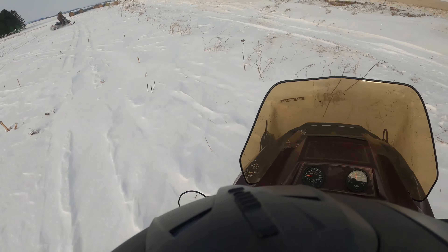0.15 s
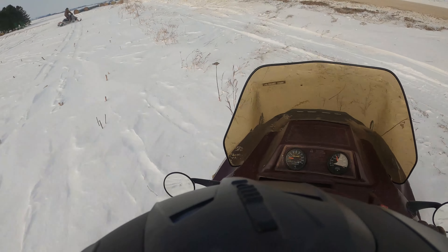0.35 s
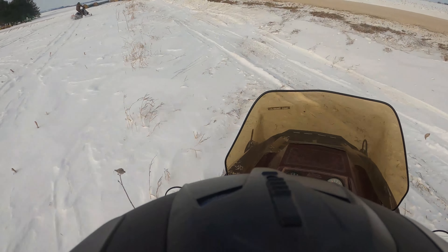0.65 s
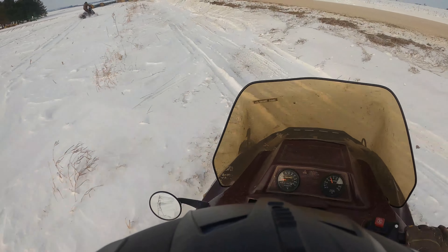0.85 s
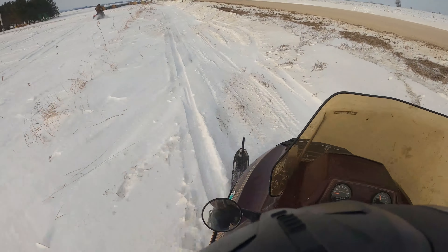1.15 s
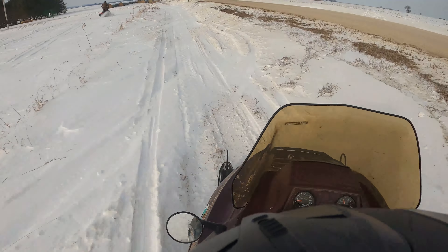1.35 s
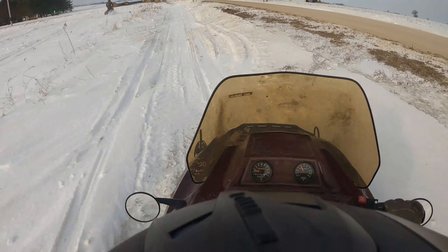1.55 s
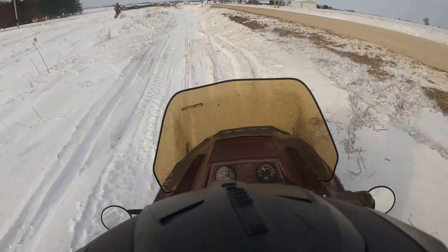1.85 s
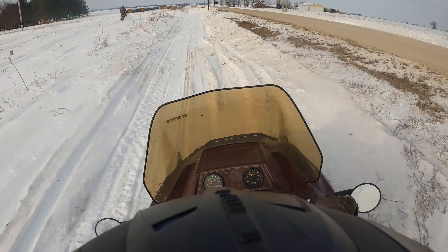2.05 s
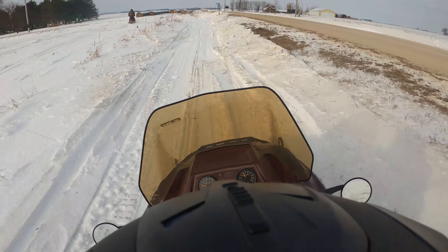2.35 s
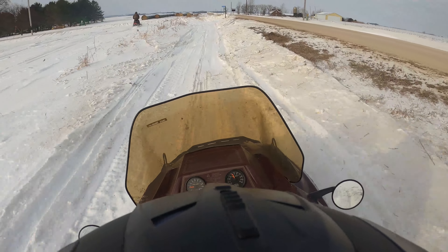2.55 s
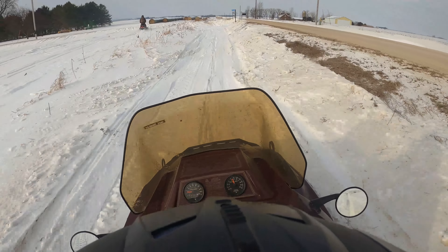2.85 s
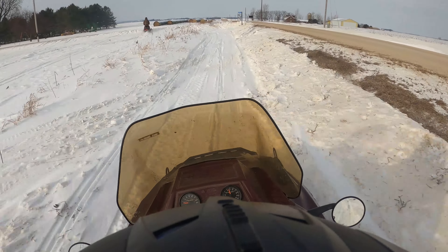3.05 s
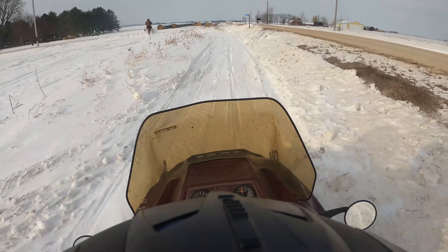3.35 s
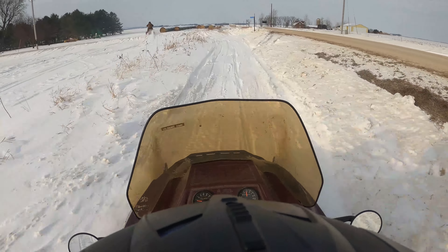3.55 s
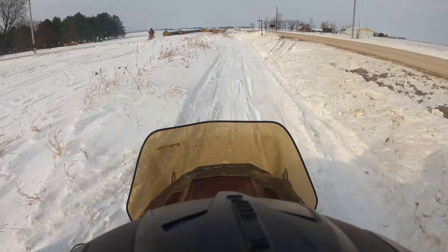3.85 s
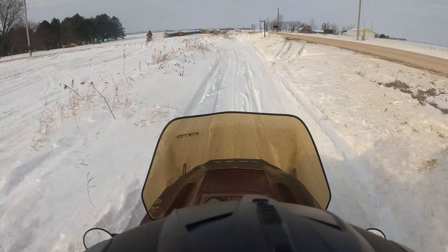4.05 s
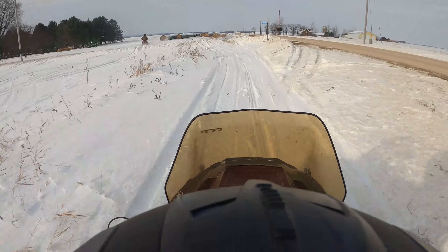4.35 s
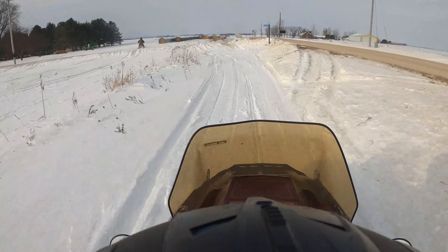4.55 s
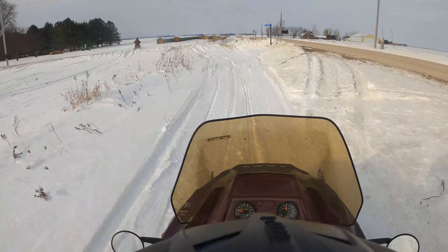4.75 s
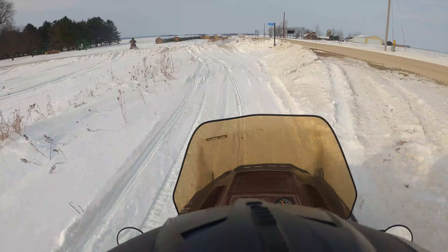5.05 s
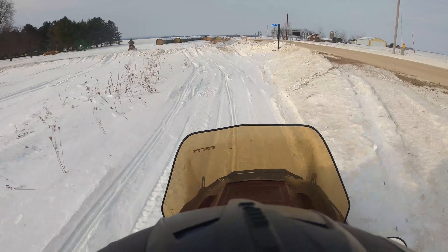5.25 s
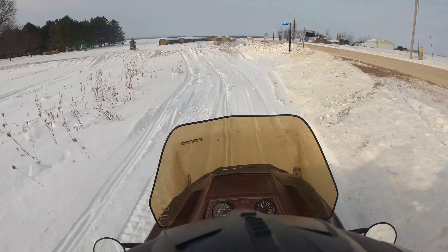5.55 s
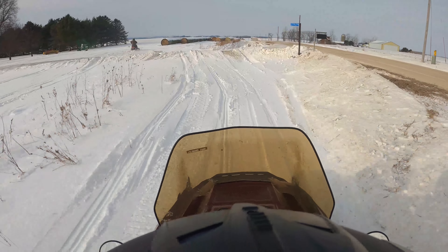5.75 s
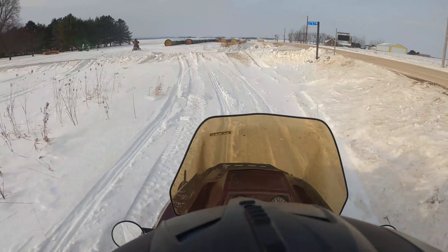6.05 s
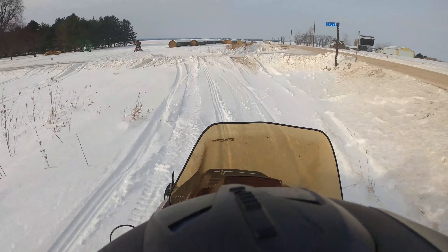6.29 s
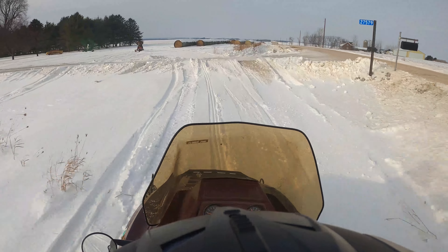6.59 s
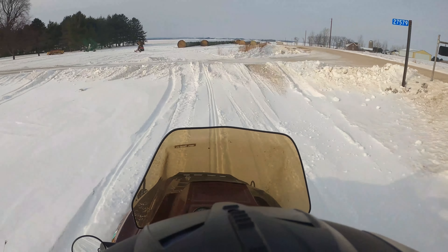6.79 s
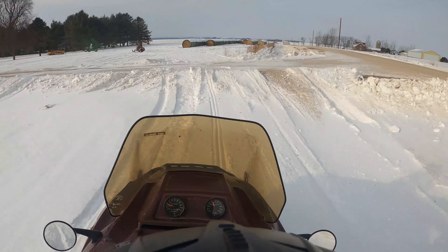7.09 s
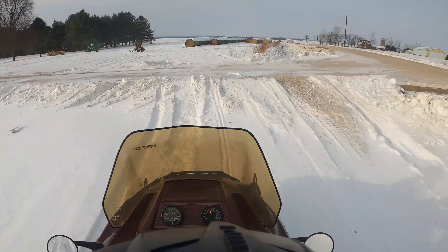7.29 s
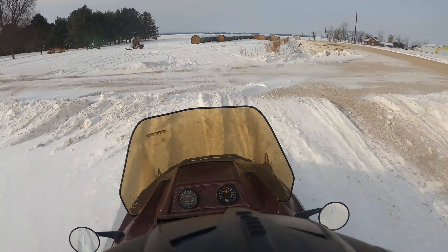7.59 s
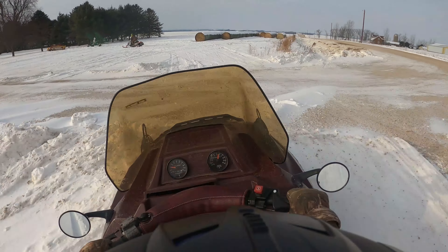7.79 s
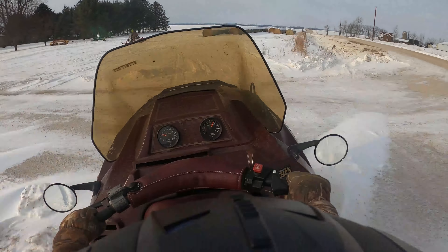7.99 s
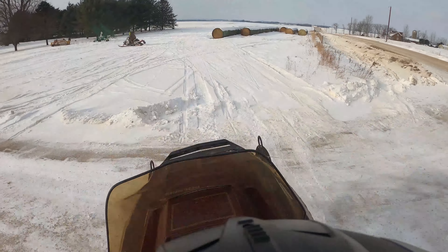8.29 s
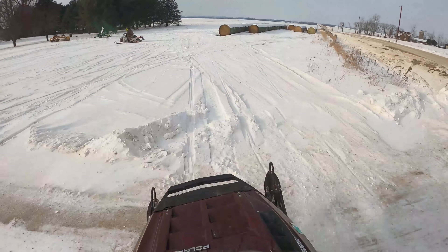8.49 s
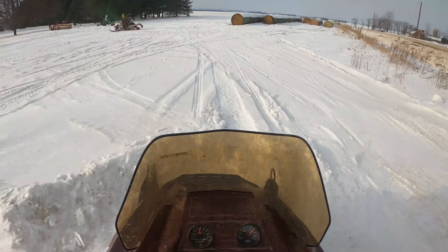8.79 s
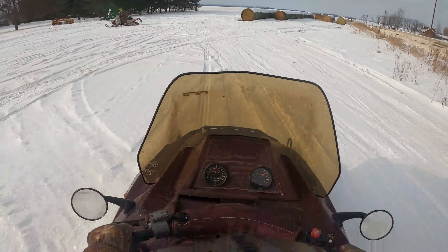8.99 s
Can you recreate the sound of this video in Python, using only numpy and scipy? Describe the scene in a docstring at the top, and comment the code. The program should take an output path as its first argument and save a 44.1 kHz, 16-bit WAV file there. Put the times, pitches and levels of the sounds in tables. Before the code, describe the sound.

Riding a snowmobile outdoors: droning engine, low track growl and wind buffeting, ending with a sharp rev, spinning track and rattling landing thumps.

```python
"""A two-stroke twin snowmobile, heard from a boxed microphone pair on the rider's helmet.
From the start, sines at the firing rate and its relatives make the engine hum, whine and buzz, and shaped
noise makes its roar and hiss. The track lugs drone at their own rate; shaped noise is wind and rumble.
Later come short falling tones, first low swoops, then also higher chirps. Near the end the engine revs up
over a bank, the track spins free, and the sled thumps down: a row of blows rings the chassis."""
import sys
import numpy as np
from scipy import signal
from scipy.fft import rfft, irfft, next_fast_len
from scipy.io import wavfile
from scipy.ndimage import uniform_filter1d

SR = 44100
rng = np.random.default_rng(int(sys.argv[2]) if len(sys.argv) > 2 else 0)


def generate_wav(signal):
    """Clip the signal to [-1, 1] and save it as 16-bit WAV at the path in sys.argv[1]."""
    frames = np.transpose(np.atleast_2d(signal))
    scaled = np.clip(frames, -1, 1) * 32767
    pcm = np.round(scaled).astype(np.int16)
    wavfile.write(sys.argv[1], SR, pcm)


N = 402633

# Engine speed: (time [s], firing rate [firings per s]); two firings make one crank turn
FIRING_RATE = [(0, 133), (.45, 133.4), (.6, 129.3), (1.35, 124.4), (1.65, 128), (1.95, 126.7), (2.1, 129.4),
               (2.3, 135.3), (2.6, 141.5), (3.15, 145.1), (3.45, 149.9), (3.75, 151.6), (4.02, 160.9),
               (4.2, 160.9), (4.55, 150.5), (5.25, 125.7), (5.7, 117.3), (6, 123.9), (6.2, 125), (6.5, 132),
               (7.05, 135.5), (7.2, 140.2), (7.36, 147.2), (7.49, 159.3), (7.58, 166), (7.72, 181),
               (7.82, 196), (7.93, 212), (8.1, 217.5), (8.27, 240), (8.36, 245), (8.55, 245.3), (8.7, 229),
               (8.8, 223), (8.87, 212), (8.97, 210), (9.05, 196), (9.13, 186)]
# Load on the engine: (time [s], extra level of roar and hiss [dB])
ENGINE_LOAD = [(0, 1), (.85, -0.5), (1.15, 0.5), (2, -1.5), (3.55, 2), (3.85, 0.5), (4.15, 2), (4.7, 1),
               (5.4, -2), (6.7, -1.5), (7.4, 0), (7.57, 3.5), (7.72, -1.5), (7.9, 2.5), (8.3, 2.5),
               (8.6, 3), (8.76, 2.5), (9, 3), (9.13, 2.5)]
# Throttle opening sharpens the exhaust pulses: (time [s], buzz level [dB])
THROTTLE_BUZZ = [(0, -33.5), (1.6, -34), (2.2, -32.5), (3.2, -32.5), (4.3, -31.5), (4.7, -34.5), (5.4, -36),
                 (6.9, -35), (7.3, -29.5), (7.55, -26), (8.05, -26.5), (8.3, -28.5), (8.6, -29),
                 (8.75, -32), (9.13, -32)]
# Exhaust hum: (time [s], firing tone [dB], its octave [dB])
EXHAUST_HUM = [(0, -19.5, -29), (.5, -21, -34.5), (.95, -22, -26), (1.4, -15, -28), (1.95, -16.5, -27),
               (2.25, -19, -39), (2.6, -19.5, -34.5), (3.3, -35, -28), (3.5, -21.5, -28.5), (3.7, -29, -26),
               (4.1, -16.5, -45), (4.4, -24, -35), (4.85, -24.5, -43), (5.4, -29.5, -26),
               (5.85, -19, -24.5), (6.45, -16.5, -35), (7.1, -19.5, -33), (7.36, -28, -28),
               (7.7, -19, -24.5), (7.95, -11.5, -39), (8.08, -14, -29.5), (8.24, -18, -30.5),
               (8.56, -26, -23), (8.63, -19.5, -24.5), (8.75, -27, -29), (8.81, -19.5, -30),
               (8.92, -11.5, -43), (9.04, -14.5, -50), (9.08, -23.5, -26), (9.13, -22, -30)]
# Hum tones set by engine speed alone: (firing rate [firings per s], crank tone [dB], triple firing tone [dB])
HUM_BY_SPEED = [(117, -39, -42), (125, -35, -37), (129, -37, -37), (133, -37, -34), (140, -36, -30),
                (145, -36, -33), (152, -33, -30), (161, -32, -33), (168, -30, -35), (180, -30, -35),
                (200, -31, -35), (212, -26, -35), (232, -22, -36), (242, -20, -36)]
# Cooling fan whine: (time [s], level [dB])
FAN_LEVEL = [(0, -30), (0.2, -41), (0.22, -40), (0.28, -31.5), (0.52, -46), (0.59, -55), (1.15, -35),
             (1.26, -44.5), (1.35, -42), (1.68, -35.5), (1.86, -60), (2.21, -35), (2.42, -52), (2.67, -42),
             (3.21, -37.5), (3.49, -54.0), (4.15, -41.5), (4.58, -52), (4.7, -36), (4.84, -47), (5.01, -35),
             (5.27, -38), (5.43, -54.0), (5.87, -54.0), (5.98, -39.5), (6.42, -45), (6.88, -33),
             (7.11, -43.0), (7.32, -35.5), (7.75, -58), (8.2, -63), (8.45, -53), (8.75, -59), (9.13, -67)]
# Single crank multiples that sing out: (peak time [s], half length [s], multiple [crank rates], level [dB])
SQUEAL_EVENTS = [(0.26, 0.18, 17, -28.0), (0.9, 0.12, 18, -26.0), (1.3, 0.12, 18, -27.0),
                 (1.43, 0.1, 17, -32.0), (1.96, 0.22, 18, -26.0), (2.12, 0.22, 14, -29.0),
                 (2.17, 0.12, 16, -28.0), (2.29, 0.19, 17, -27.0), (2.5, 0.28, 18, -31.0),
                 (2.54, 0.3, 16, -29.0), (2.68, 0.33, 3, -30.0), (2.84, 0.22, 12, -36.0),
                 (2.87, 0.22, 17, -30.0), (2.91, 0.15, 15, -27.0), (2.96, 0.15, 16, -31.0),
                 (3.74, 0.22, 15, -27.0), (3.86, 0.12, 14, -29.0), (4.11, 0.18, 13, -28.0),
                 (4.33, 0.16, 14, -27.0), (5.48, 0.1, 5, -34.0), (5.72, 0.1, 18, -28.0),
                 (6.26, 0.1, 7, -34.0), (6.64, 0.12, 17, -29.0), (7.34, 0.18, 8, -37.0),
                 (7.42, 0.1, 15, -25.0), (7.53, 0.1, 14, -26.0), (7.62, 0.11, 13, -28.0),
                 (7.62, 0.14, 10, -30.0), (7.73, 0.39, 12, -28.0), (7.83, 0.25, 11, -24.0),
                 (7.88, 0.1, 9, -32.0), (7.88, 0.3, 5, -33.0), (7.99, 0.21, 7, -35.0),
                 (8.03, 0.24, 8, -30.0), (8.06, 0.1, 15, -38.0), (8.09, 0.18, 10, -27.0),
                 (8.33, 0.19, 5, -32.0), (8.51, 0.1, 11, -33.0), (8.52, 0.28, 3, -31.0),
                 (8.56, 0.15, 14, -40.0), (8.61, 0.24, 10, -26.0), (8.68, 0.1, 12, -31.0),
                 (8.68, 0.11, 9, -28.0), (9.05, 0.09, 11, -29.0), (.1, .12, 17, -29), (.55, .12, 16, -30),
                 (7.48, .12, 11, -31), (7.5, .12, 10, -33), (7.52, .1, 12, -30), (7.7, .12, 9, -33),
                 (2.74, .08, 38, -57), (2.96, .14, 42, -53), (2.96, .1, 48, -54), (3.12, .08, 36, -59),
                 (3.32, .06, 38, -54), (3.35, .1, 35, -57), (3.52, .04, 46, -49), (3.53, .04, 40, -47),
                 (3.71, .08, 40, -50), (3.92, .04, 36, -46), (4.1, .06, 33, -53), (4.14, .11, 42, -43),
                 (4.23, .07, 36, -50), (7.93, .06, 38, -51), (8.03, .05, 32, -47), (8.35, .07, 27, -45),
                 (8.4, .07, 30, -48), (8.4, .1, 18, -43), (8.46, .12, 21, -51), (8.36, .08, 28, -46),
                 (8.45, .12, 26, -48), (8.57, .06, 28, -47)]
# The two cylinders differ, so odd crank multiples sound too: (multiple [crank rates], extra level [dB])
BUZZ_MULTIPLES = [(3, 3), (5, 3), (7, 0), (8, 0), (9, -2), (10, -1), (11, 0), (12, 0), (13, -4), (14, 0),
                  (15, 0), (16, -1), (17, 1), (18, 1), (19, -4), (20, -3), (21, -1), (22, 0), (23, -1),
                  (25, 1), (26, -1), (27, -2), (28, -1), (30, -3), (32, -3), (34, -3), (36, -4), (38, -5),
                  (42, -5), (46, -4), (48, -3), (50, -4), (52, -3)]
# Tone colour of the buzz: (frequency [Hz], level per tone [dB])
BUZZ_COLOUR = [(150, -9), (250, -11), (400, -9), (550, -10), (700, -11.5), (850, -5.5), (1000, -1.5),
               (1120, .5), (1250, -6), (1450, -15), (1700, -19), (2100, -22), (2500, -32), (2900, -26),
               (3400, -24), (4500, -36)]
# Colours of the noises, only their shape counts: (frequency [Hz], relative level per Hz [dB])
RASP_COLOUR = [(5500, -33), (6400, -8), (7000, 2.5), (7500, -8), (8100, -35.5), (9800, -24), (11500, -22.5),
               (13000, -66)]
ROAR_COLOUR = [(320, -42), (550, -10), (709, -11.5), (1100, 2.5), (1260, -6.5), (1350, -9.5), (1640, -11),
               (1830, -19), (2000, -18.5), (2370, -31), (2600, -44.5), (3380, -71.5), (5720, -120)]
HISS_COLOUR = [(1410, -45.5), (2400, -9), (2540, -8), (2780, -6), (2930, -4), (3020, -2), (3130, -5),
               (3280, 0.5), (3370, -3), (3450, -0.5), (3620, -5), (3760, -2.5), (3870, -6), (4000, -1.5),
               (4200, -3.5), (4930, -12), (5400, -16.5), (7020, -42.5), (11900, -120)]
SIZZLE_COLOUR = [(3500, -37), (4800, -11.5), (5400, 3.5), (6200, 2), (7000, -2.5), (7700, -7.5),
                 (8300, -32), (9500, -29), (12000, -23.5)]
BUFFET_COLOUR = [(15, -19.5), (25, -5), (40, -2.5), (65, 1), (100, 6.5), (140, -3), (200, -20),
                 (500, -90.5)]
RUMBLE_COLOUR = [(60, -30), (110, 0), (150, 3), (200, 1), (300, -2.5), (450, -1.5), (620, -11.5),
                 (800, -29.5), (1500, -89)]
# Treble sizzle of the engine: (time [s], level [dB])
SIZZLE_LEVEL = [(0.05, -59), (0.2, -62.5), (1.74, -59.5), (1.79, -62.5), (4.26, -61.5), (5.36, -63.5),
                (7.08, -63), (7.25, -58), (7.43, -62), (7.55, -53), (7.68, -57), (8.28, -55.5),
                (8.57, -53.5), (8.7, -52.5), (8.72, -58.5), (9.0, -57)]
# Track lugs slapping past the drive wheel: (time [s], lug rate [lugs per s])
LUG_RATE = [(0, 92.3), (.45, 93.5), (.6, 89.3), (1.35, 85.5), (1.65, 87.5), (1.95, 85), (2.1, 85.8),
            (2.4, 93.5), (3, 101.8), (3.75, 110.9), (4.02, 123.3), (4.7, 124.3), (5.1, 121), (5.85, 111.2),
            (7.2, 111.2), (7.4, 116), (7.68, 135), (8, 174.5), (8.08, 180), (8.46, 304), (8.6, 303.5),
            (9.13, 276.3)]
# Lug drone as the track grips and slips: (time [s], level [dB])
DRONE_LEVEL = [(0, -19), (0.11, -28), (0.25, -17), (0.38, -25), (0.51, -20), (0.63, -22.5), (0.91, -22),
               (1.07, -27.5), (1.37, -18.5), (1.48, -35), (1.67, -18.5), (2.06, -26.5), (2.22, -19),
               (2.6, -24), (3.0, -14), (3.49, -21), (3.67, -13.5), (4.32, -21.5), (4.47, -13), (4.67, -19),
               (4.78, -13), (5.01, -16.5), (5.4, -13.5), (5.63, -19), (5.75, -13.5), (5.89, -14),
               (5.99, -28), (6.07, -16), (6.17, -25), (6.29, -12.5), (6.49, -20), (6.7, -19), (7.51, -13.5),
               (8.06, -21), (8.16, -29.5), (8.45, -25), (8.6, -38), (9.13, -35)]
# Air and snow: (time [s], wind buffet [dB], chassis rumble [dB])
WIND_AND_RUMBLE = [(0, -22, -28.5), (.6, -25.5, -26), (1.05, -20, -26), (1.42, -25.5, -28),
                   (1.65, -25.5, -23.5), (1.8, -32.5, -29.5), (2.6, -29.5, -24), (2.87, -27.5, -25),
                   (3.3, -30.5, -24), (3.9, -29.5, -26), (4.7, -27.5, -25), (5, -23.5, -24),
                   (5.16, -33.5, -28), (5.54, -20, -25), (6.2, -26.5, -26.5), (7, -37.5, -26),
                   (7.48, -25.5, -28.5), (7.96, -35, -29), (8.26, -24.5, -27.5), (8.45, -27, -24.5),
                   (8.8, -32, -19), (9.13, -26, -25.5)]
# Short falling tones, low swoops and higher chirps:
# (peak time [s], half length [s], pitch at the peak [Hz], fall [Hz per s], level [dB])
FALLING_TONES = [(4.608, 0.11, 95, 70.6, -23.5), (4.965, 0.14, 83, 60.5, -26), (8.282, .05, 1070, 874, -32),
                 (8.64, 0.041, 1387, 596, -32), (8.825, 0.021, 296, 802, -22), (8.931, .03, 370, 1300, -26),
                 (9.012, .035, 286, 893, -21)]
# The sled lands and the suspension bottoms out: (time [s], blow strength before random spread [dB])
LANDING_BLOWS = [(8.578, -22), (8.622, -17), (8.667, -16), (8.726, -12), (8.788, -13.5), (8.834, -13),
                 (8.907, -21), (8.982, -21.5)]
# Ringing modes of the chassis: (frequency [Hz], relative level [dB], time to fade by 60 dB [s])
CHASSIS_MODES = [(119.6, 5, 0.16), (291, -5, 0.13), (394, -9.5, 0.04), (600, -12, 0.06), (1170, -11.5, .04)]
# The two microphone ports: (frequency [Hz], share of noise common to both [0-1],
# left minus right level [dB], lead of the left port [radians])
PORT_PAIR = [(40, .985, 1.7, -.02), (200, .995, 1.6, -.1), (500, .99, 2.8, -.09), (780, .99, 5.4, -.08),
             (1250, .98, 3.8, -.06), (1550, .93, .5, -.19), (1850, .9, 3.5, -.35), (2450, .92, .9, -1.8),
             (2850, .74, 10, -1.45), (3350, .92, 5.7, -.47), (3950, .77, -.3, -.8), (4400, .4, 2.5, -2),
             (4800, .78, 1.5, -2.45), (5700, .3, -1.4, -3.3), (7700, .1, 17, -3.3)]

ROAR_DB, HISS_DB = -22.5, -43  # with no extra load; the roar level is at cruising throttle
ROAR_FOLLOWS = 1  # dB per dB of load
CRUISE_BUZZ_DB = -33
ROAR_PER_THROTTLE = -0.5  # dB per dB of buzz above cruising
RASP_MULTIPLES, FULL_SPEED_HZ = range(25, 32), 245  # multiples of the firing rate; firings per s
RASP_TONE_DB, RASP_NOISE_DB = -68, -67  # at full speed
RASP_FADES_DB_PER_HZ = .5  # loss for each firing per s below full speed
KNEE_DB, HELD_SHARE = -12, 0.34  # gain control: share of the excess above the knee taken off
SENSE_S, RECOVER_DB_PER_S = 0.019, 61
OVERLOAD = 1.4  # peaks round off towards this height
CUTOFF_HZ = 13400


def from_db(db):
    """Turns decibels into a plain gain."""
    return 10 ** (np.asarray(db) / 20)


def rms_one(x):
    """Scales a sound to an rms level of 1."""
    return x / np.sqrt(np.mean(x ** 2) + 1e-20)


def in_time(rows):
    """Draws straight lines between the rows of a time table, one curve per column."""
    s, *columns = np.transpose(rows)
    return [np.interp(np.arange(N) / SR, s, column) for column in columns]


def at_hz(points, hz, axis=1):
    """Reads one column of a frequency table, in between on a log frequency scale."""
    points = np.array(points)
    return np.interp(np.log(hz + 1), np.log(points[:, 0] + 1), points[:, axis])


def filtered(x, response):
    """Multiplies the spectrum by response(hz)."""
    size = next_fast_len(N)
    hz = np.arange(size // 2 + 1) * SR / size
    return irfft(rfft(x, size) * response(hz), size)[..., :N]


def drift(rate):
    """Slow random wander of spread 1: noise at every 40th sample, smoothed twice at rate Hz."""
    r = np.exp(-80 * np.pi * rate / SR)
    steps = rng.standard_normal(N // 40 + 2002)
    slow = signal.lfilter([1], [1, -2 * r, r * r], steps)[2000:]  # drop the filter's start-up
    return np.interp(np.arange(N) / 40, np.arange(len(slow)), rms_one(slow))


def turns(per_s):
    """Running angle in radians of something that repeats per_s times a second."""
    return 2 * np.pi * np.cumsum(per_s) / SR


def tone(angle, rms_db):
    """A sine of the given rms level, starting anywhere in its cycle."""
    return np.sqrt(2) * from_db(rms_db) * np.sin(angle + 2 * np.pi * rng.random())


def bump(since_s, half_s):
    """A smooth swell and fade around time zero."""
    return np.exp(-(since_s / half_s) ** 2)


def noise(spectrum, swell):
    """Coloured noise, partly common to both ports and partly each one's own; swell is its gain in time."""
    common, left, right = rng.standard_normal((3, N)) * swell
    share = lambda hz: at_hz(PORT_PAIR, hz)
    colour = lambda hz: from_db(at_hz(spectrum, hz))
    both = filtered(common, lambda hz: colour(hz) * np.sqrt(share(hz)))
    own = filtered([left, right], lambda hz: colour(hz) * np.sqrt(1 - share(hz)))
    return rms_one(both + own)


def exhaust_hum(firing, firing_hz):
    """Clean low tones at the crank rate, the firing rate and twice and three times the firing rate."""
    first_db, second_db = in_time(EXHAUST_HUM)
    crank_db = at_hz(HUM_BY_SPEED, firing_hz, axis=1)
    third_db = at_hz(HUM_BY_SPEED, firing_hz, axis=2)
    low = tone(firing / 2, crank_db) + tone(firing, first_db)
    return low + tone(2 * firing, second_db) + tone(3 * firing, third_db)


def fan_whine(firing):
    """The cooling fan passes twelve blades for each firing."""
    level_db, = in_time(FAN_LEVEL)
    return tone(12 * firing, level_db)


def squeals(firing):
    """Single multiples of the crank rate swell and fade, wavering in pitch and level."""
    out = np.zeros(N)
    waver = .7 * drift(14.0)  # radians
    level_waver_db = 2.5 * waver[::-1]  # the same wander played backwards
    for peak_s, half_s, multiple, level_db in SQUEAL_EVENTS:
        start = max(0, int((peak_s - 3 * half_s) * SR))
        stop = min(N, int((peak_s + 3 * half_s) * SR))
        near = np.arange(start, stop)
        angle = multiple * firing[near] / 2 + waver[near]
        squeal = tone(angle, level_db + level_waver_db[near])
        out[near] += squeal * bump(near / SR - peak_s, half_s)
    return out


def rasp(firing, firing_hz):
    """Near full speed the exhaust rasps: high firing multiples over a band of bright noise."""
    fade_db = RASP_FADES_DB_PER_HZ * (firing_hz - FULL_SPEED_HZ)
    out = from_db(RASP_NOISE_DB + fade_db) * noise(RASP_COLOUR, 1)
    for k in RASP_MULTIPLES:
        out = out + tone(k * firing, RASP_TONE_DB + fade_db + 3.0 * drift(8.0))
    return out


def buzz(firing, firing_hz, buzz_db):
    """Sharp exhaust pulses sound as many crank multiples; uneven burning makes each swell and fade."""
    out = 0
    for multiple, level_db in BUZZ_MULTIPLES:
        k = multiple / 2  # in firing rates
        swell_db = level_db + at_hz(BUZZ_COLOUR, k * firing_hz) + 2.8 * drift(4.0)
        blur = (.15 + .03 * k) * drift(8.0)  # radians; higher multiples blur more
        out = out + tone(k * firing + blur, buzz_db + swell_db)
    return out


def roar_and_hiss(firing, buzz_db):
    """Roar, hiss and treble sizzle: three bands of noise that puff at the firing and crank rates."""
    load_db, = in_time(ENGINE_LOAD)
    sizzle_db, = in_time(SIZZLE_LEVEL)
    puff = 1 + 0.053 * np.sin(firing) + 0.049 * np.sin(firing / 2)
    roar_db = ROAR_DB + ROAR_FOLLOWS * load_db + ROAR_PER_THROTTLE * (buzz_db - CRUISE_BUZZ_DB)
    roar = from_db(roar_db) * noise(ROAR_COLOUR, puff * from_db(0.64 * drift(8.6)))
    flicker = from_db(1.0 * drift(18.0))  # shared by hiss and sizzle
    hiss = from_db(HISS_DB + load_db) * noise(HISS_COLOUR, puff * flicker)
    sizzle_swell = puff * flicker * from_db(1.2 * drift(17.0))
    sizzle = from_db(sizzle_db) * noise(SIZZLE_COLOUR, sizzle_swell)
    return roar + hiss + sizzle


def engine():
    """All engine sounds follow one running firing angle, so their pitches move together."""
    firing_hz, = in_time(FIRING_RATE)
    buzz_db, = in_time(THROTTLE_BUZZ)
    firing = turns(firing_hz)
    tones = exhaust_hum(firing, firing_hz) + fan_whine(firing) + squeals(firing)
    rough = rasp(firing, firing_hz) + buzz(firing, firing_hz, buzz_db)
    return tones + rough + roar_and_hiss(firing, buzz_db)


def track():
    """The drone of the lugs, slightly unsteady on uneven snow, with a weak octave."""
    lug_hz, = in_time(LUG_RATE)
    drone_db, = in_time(DRONE_LEVEL)
    lugs = turns(lug_hz) + 0.25 * drift(6.7)
    drone = tone(lugs, drone_db + .8 * drift(6.0))
    octave = tone(2 * lugs, -38 + 3.0 * drift(3.0))
    return drone + octave


def ride():
    """Lumpy wind on the box and the rumble of skis and chassis over the snow, both as low noise."""
    wind_db, rumble_db = in_time(WIND_AND_RUMBLE)
    wind = from_db(wind_db) * noise(BUFFET_COLOUR, from_db(0.68 * drift(13.0)))
    rumble = from_db(rumble_db) * noise(RUMBLE_COLOUR, from_db(1.1 * drift(5.4)))
    return wind + rumble


def falling_tones():
    """Low swoops and higher chirps: each is a sine that slides down while it swells and fades."""
    out = 0
    for peak_s, half_s, pitch_hz, fall_hz, level_db in FALLING_TONES:
        since = np.arange(N) / SR - peak_s
        sliding = tone(turns(pitch_hz - fall_hz * since), level_db)
        out = out + sliding * bump(since, half_s)
    return out


def landing():
    """Each blow is a soft push that sets the chassis modes ringing with strengths of its own."""
    s, peak_db = np.transpose(LANDING_BLOWS)
    out = np.zeros(N)
    for hz, level_db, fade_s in CHASSIS_MODES:
        blows = np.full(N, 1e-18)  # tiny floor instead of exact zero
        spread_db = rng.normal(0, 1.8, len(s))
        blows[(s * SR).astype(int)] = from_db(peak_db + level_db + spread_db)
        r = from_db(-60 / (fade_s * SR))  # what is left of the ringing after one sample
        w = 2 * np.pi * hz / SR
        out += signal.lfilter([0, np.sin(w)], [1, -2 * r * np.cos(w), r * r], blows)
    soften = signal.butter(2, 1500, fs=SR, output="sos")
    return signal.sosfilt(soften, out)


def gain_control(x):
    """Turns both ports down at once when the sound passes the knee, and recovers at a steady pace."""
    sense = int(SENSE_S * SR)
    power = uniform_filter1d(np.mean(x ** 2, axis=0), sense)
    level_db = 10 * np.log10(power + 1e-12)
    ramp = RECOVER_DB_PER_S * np.arange(N) / SR
    held_db = np.maximum.accumulate(level_db + ramp) - ramp  # falls no faster than the ramp
    cut_db = HELD_SHARE * np.maximum(held_db - KNEE_DB, 0)
    return x * from_db(-uniform_filter1d(cut_db, sense))


def scene():
    """Adds up all the sources."""
    return engine() + track() + ride() + falling_tones() + landing()


def record(dry):
    """The ports differ in level and phase; loud moments are held down, peaks rounded, the top cut."""
    side = np.array([[.5], [-.5]])  # left and right each take half of the difference
    level = lambda hz: from_db(side * at_hz(PORT_PAIR, hz, axis=2))
    lead = lambda hz: np.exp(1j * side * at_hz(PORT_PAIR, hz, axis=3))
    ports = filtered(dry, lambda hz: level(hz) * lead(hz))
    rounded = OVERLOAD * np.tanh(gain_control(ports) / OVERLOAD)
    top_cut = signal.cheby2(12, 70, CUTOFF_HZ, fs=SR, output="sos")
    return signal.sosfilt(top_cut, rounded)


dry = scene()
out = record(dry)
generate_wav(out)
```